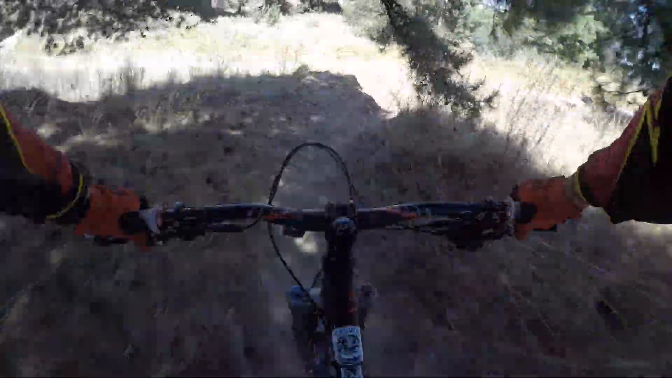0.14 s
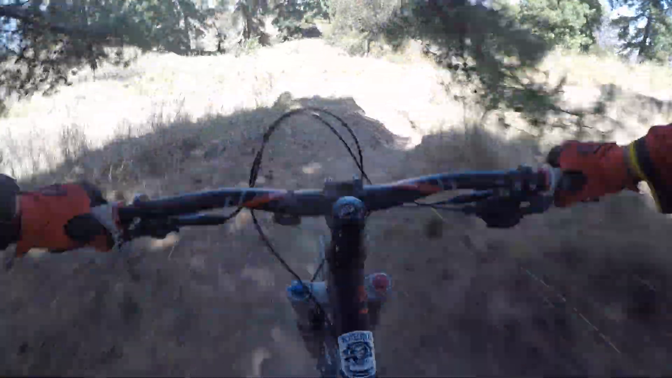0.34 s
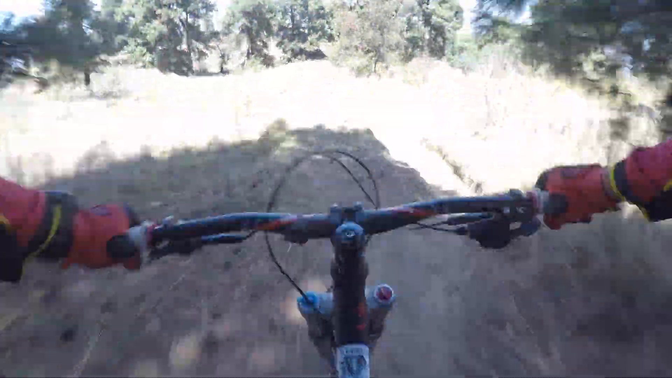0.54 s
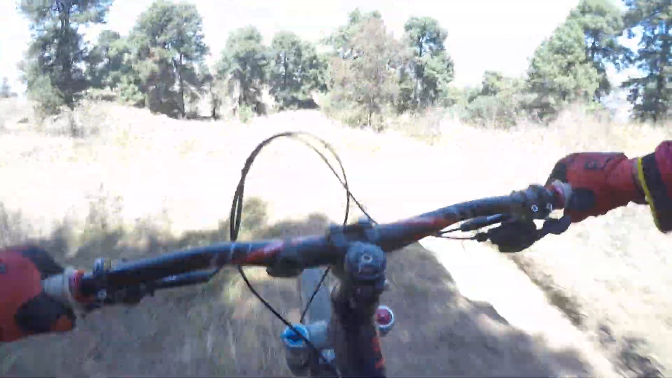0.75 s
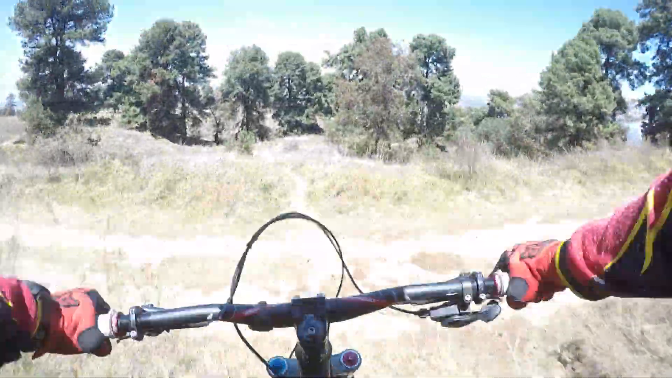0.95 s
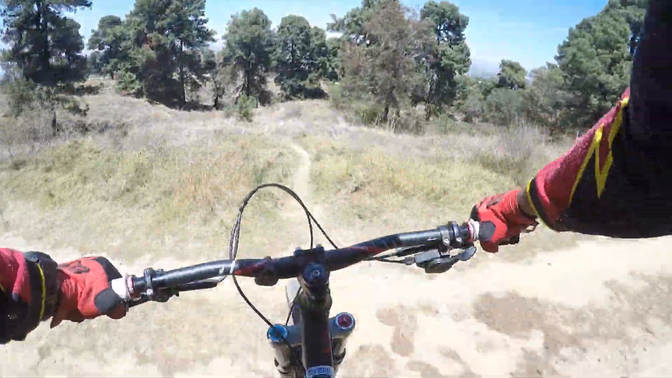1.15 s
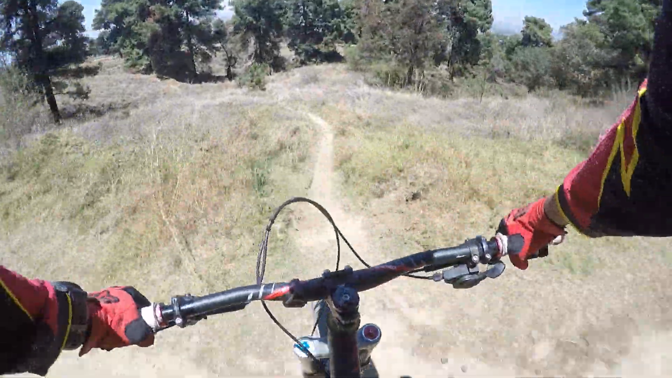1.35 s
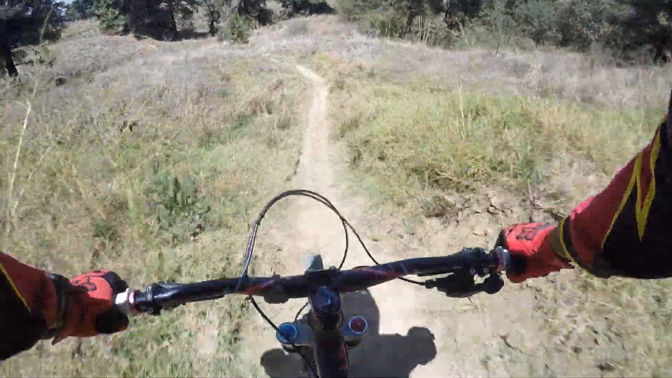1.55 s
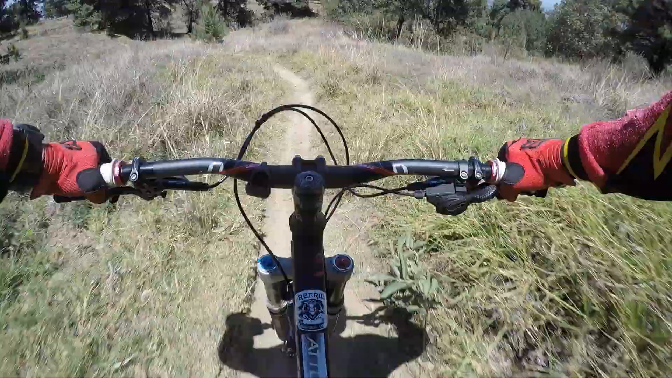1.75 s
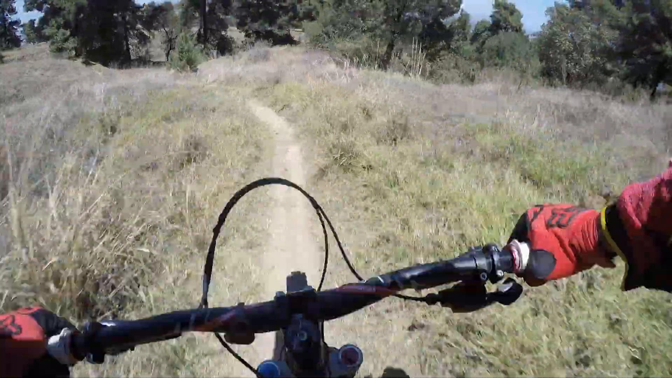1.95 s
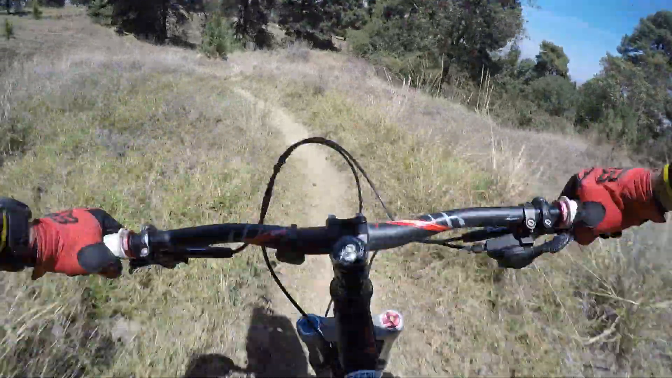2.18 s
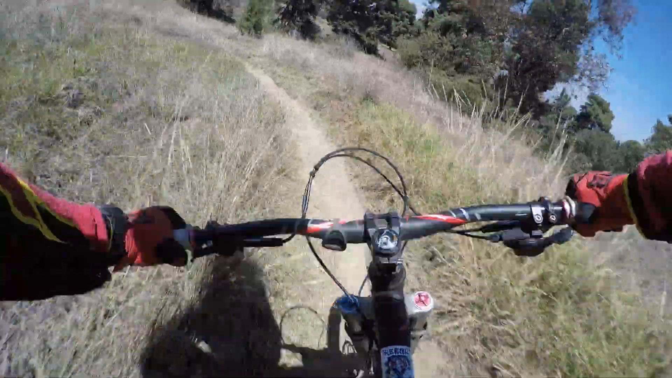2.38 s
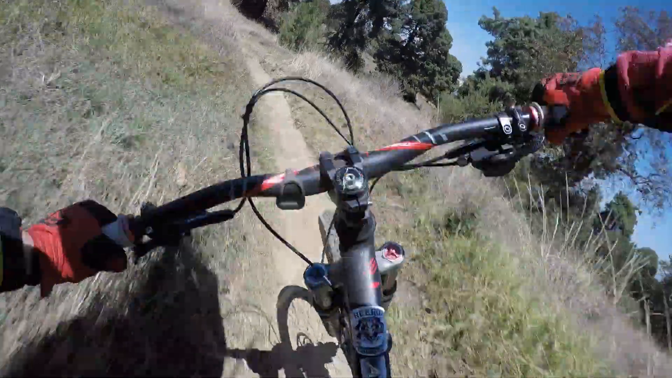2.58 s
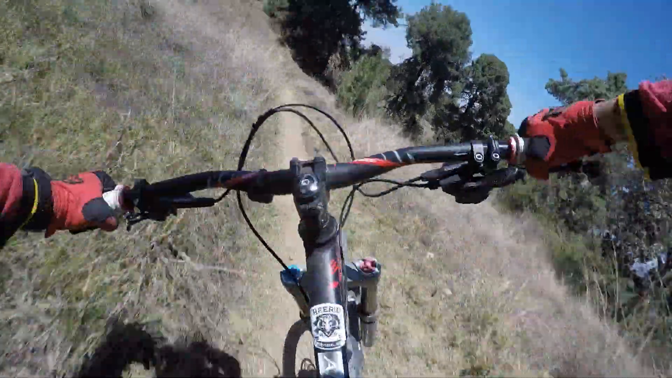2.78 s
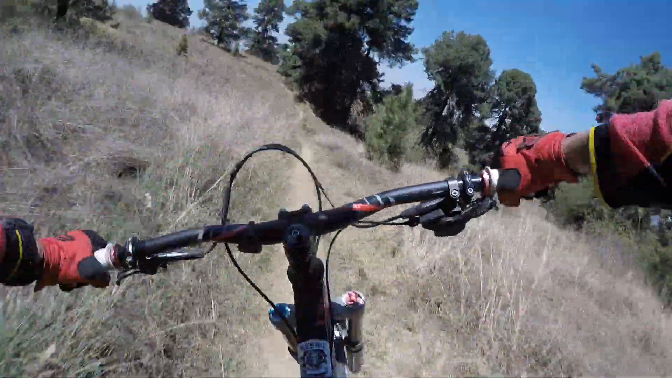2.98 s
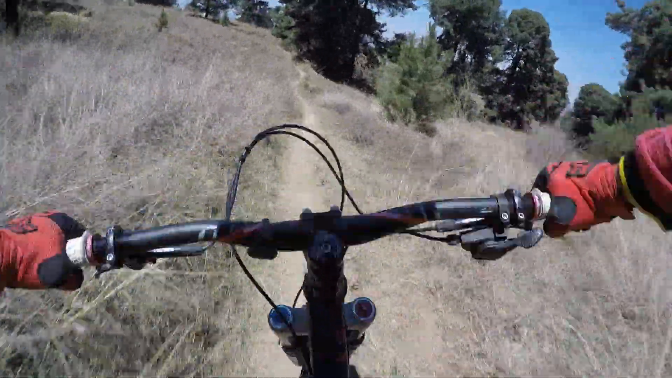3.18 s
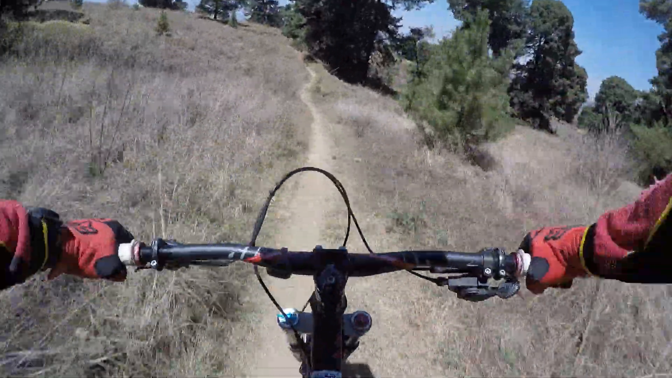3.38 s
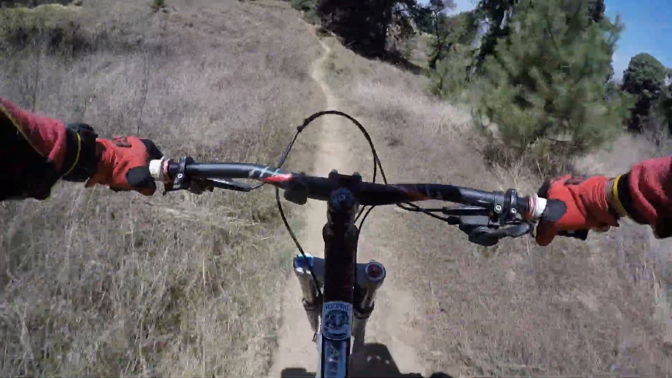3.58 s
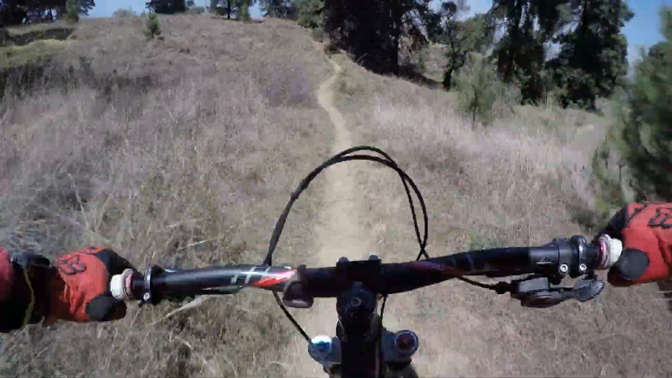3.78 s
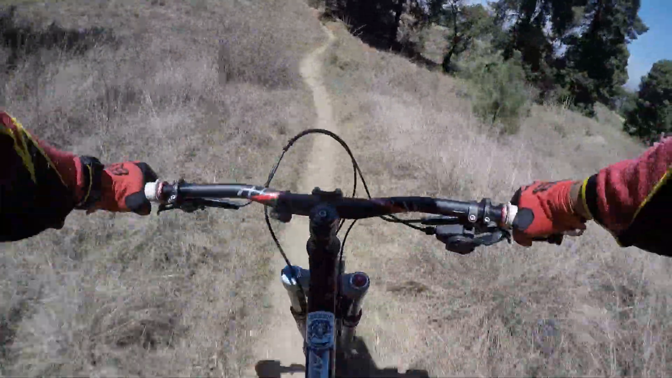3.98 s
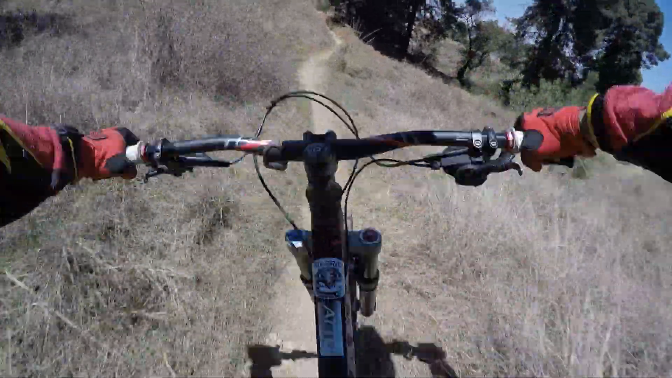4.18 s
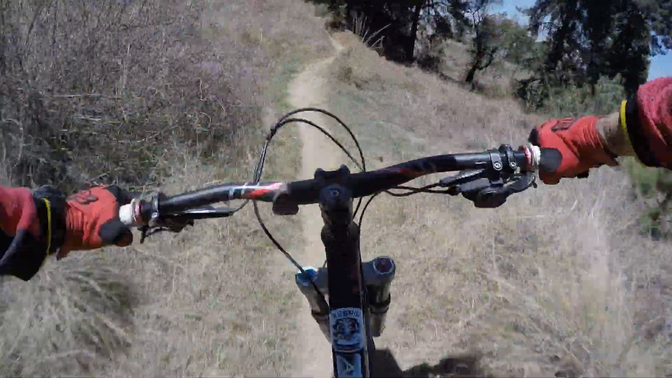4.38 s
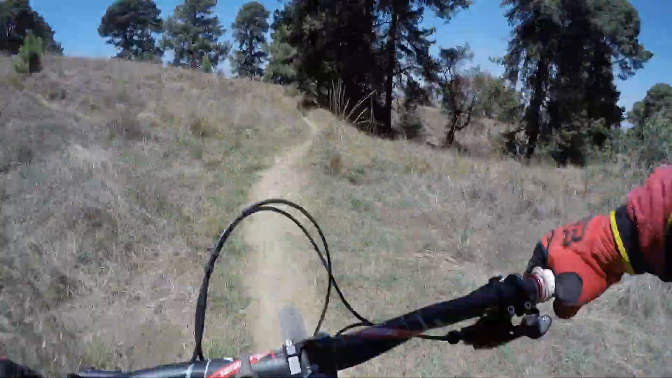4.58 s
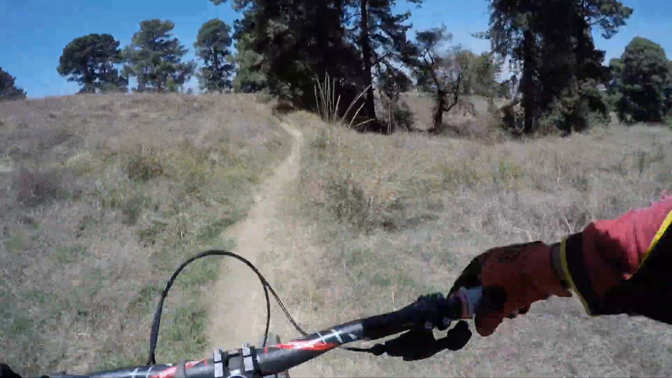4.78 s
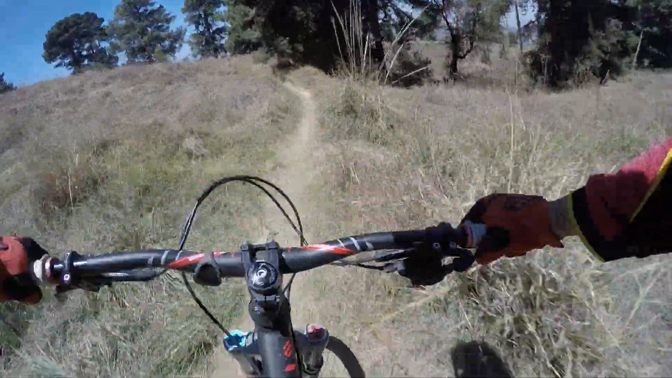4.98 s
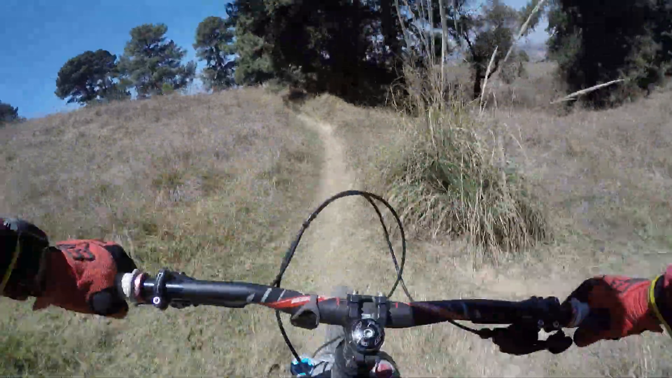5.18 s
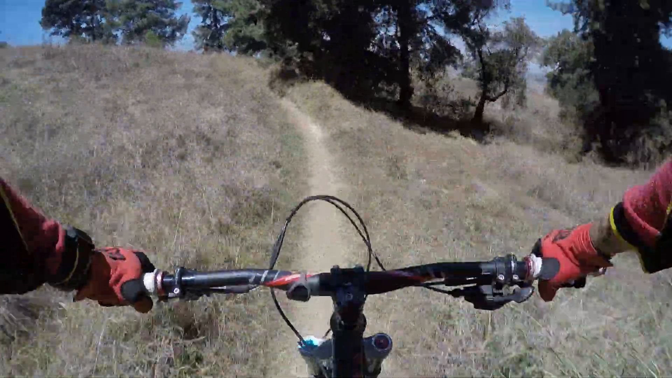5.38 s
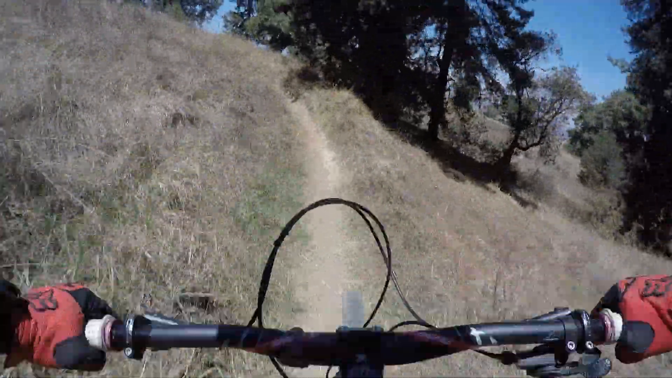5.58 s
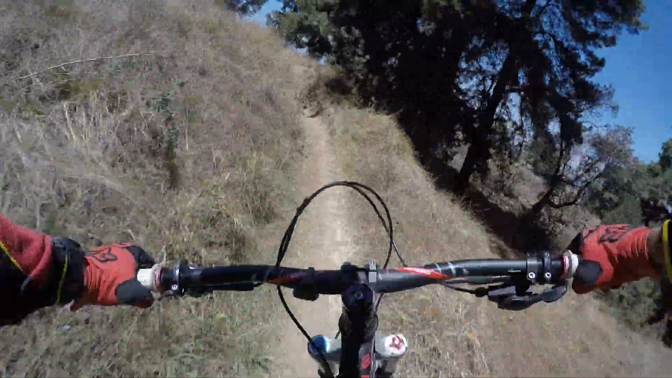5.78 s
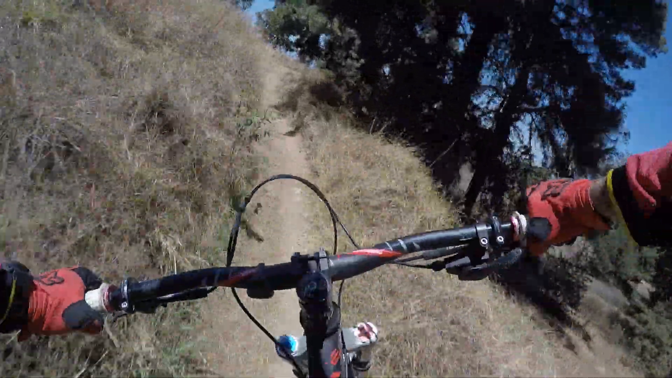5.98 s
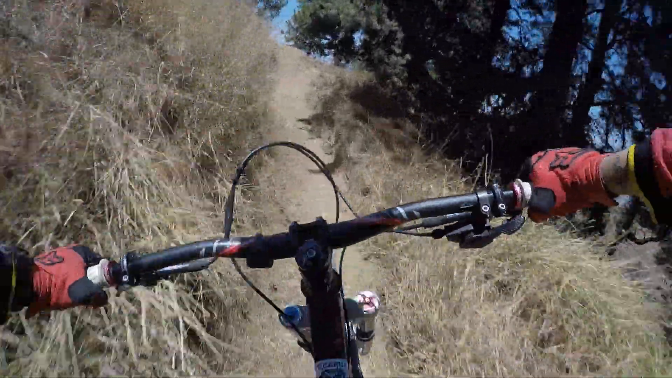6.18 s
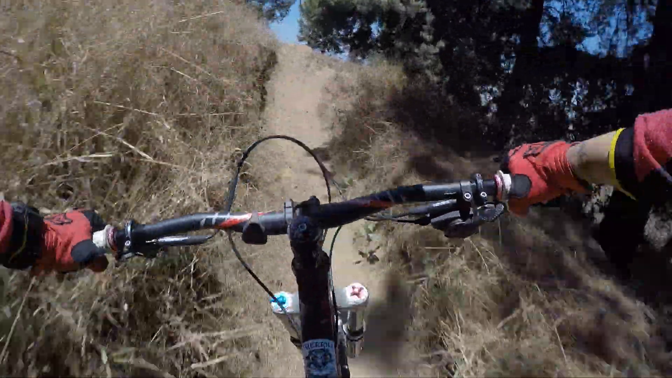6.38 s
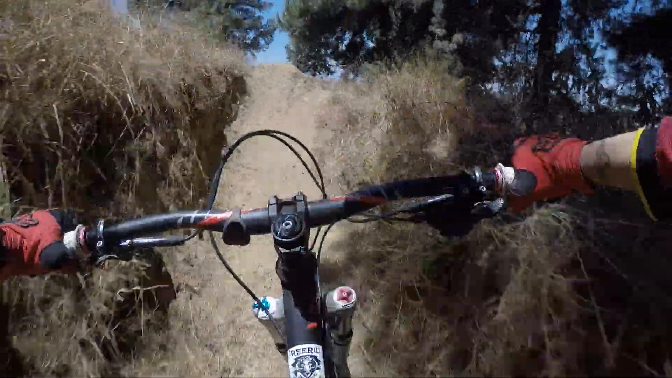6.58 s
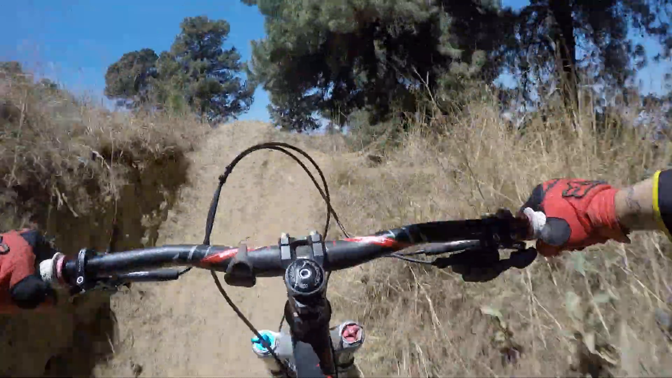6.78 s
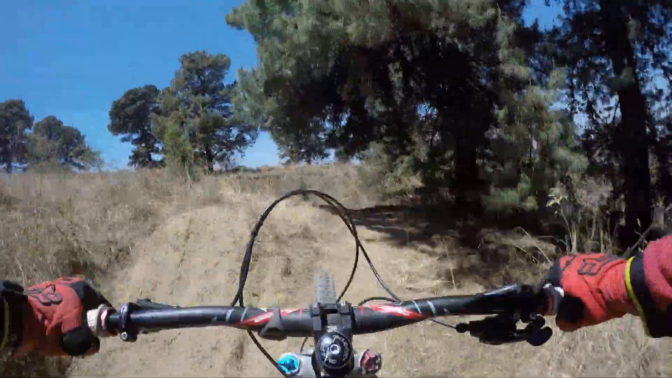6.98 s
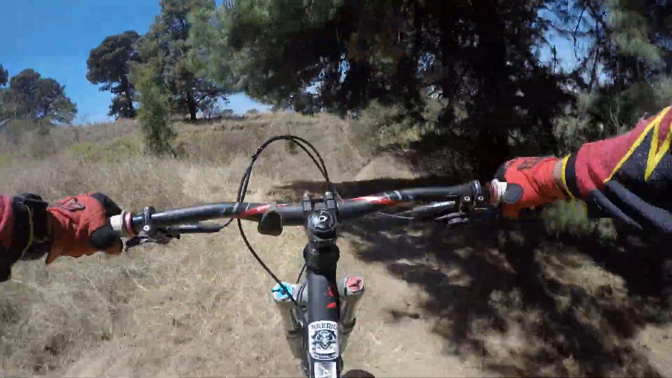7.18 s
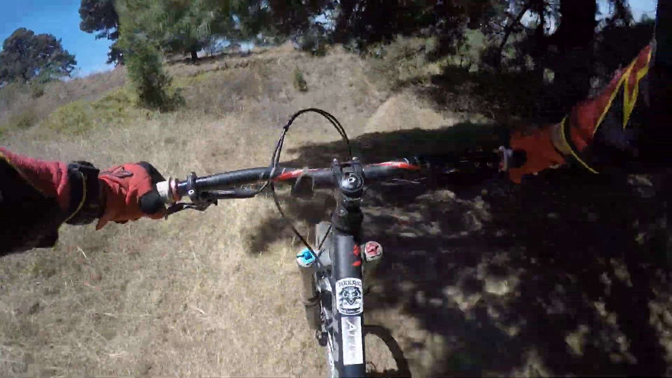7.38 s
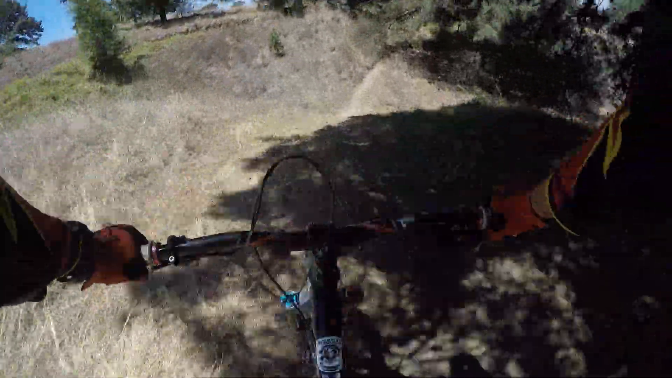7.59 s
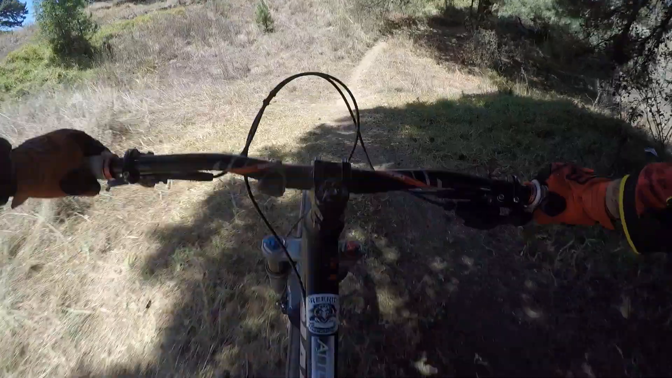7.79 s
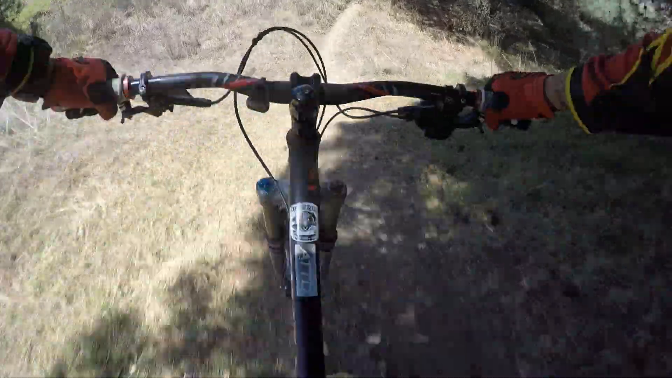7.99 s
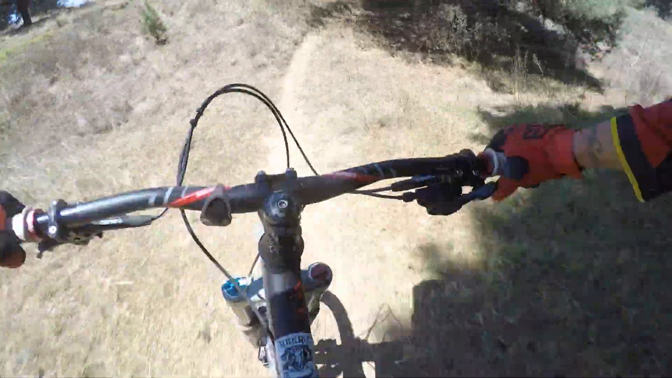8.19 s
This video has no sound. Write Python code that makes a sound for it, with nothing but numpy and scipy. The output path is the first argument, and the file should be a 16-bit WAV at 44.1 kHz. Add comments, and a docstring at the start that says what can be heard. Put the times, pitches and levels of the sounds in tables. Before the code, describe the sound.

A mountain bike clatters fast down a dirt trail, tyres crunching, dry grass rustling, with hard knocks and deep rumbling buffeting heard from inside a casing.

```python
"""Tyres crunch and rasp over dirt, dry grass rustles and buffeting rumbles as a mountain bike runs fast downhill.
Over this come whipping stalks, soft bumps, hollow landings, hard ringing knocks and muffled frame clacks.
All is heard inside a plastic housing on the rider's chest. Filtered noise makes the buffeting;
streams of tiny cracks make tyres and grass; decaying sine modes make the struck sounds."""
import sys
import numpy as np
from scipy import signal
from scipy.fft import rfft, irfft, next_fast_len
from scipy.io import wavfile

SR = 44100
rng = np.random.default_rng(int(sys.argv[2]) if len(sys.argv) > 2 else 0)


def master(y):
    """Save y as 16-bit WAV."""
    cut = np.clip(np.atleast_2d(y).T, -1, 1)
    pcm = np.round(cut * 32767)  # scale
    wavfile.write(sys.argv[1], SR, pcm.astype(np.int16))


N = 363825
TIME = np.arange(N) / SR
RING = np.arange(int(0.4 * SR)) / SR  # time within one struck sound, s

# modes of housing and mount: (nominal frequency [Hz], relative level [dB], t60 [s], polarity [+-1])
HOUSING_MODES = [(37.06, -0.5, 0.08, 1), (308, -8.5, 0.022, 1), (411, -24.5, 0.043, 1),
                 (780, -31.5, 0.047, 1), (1085, -15.5, 0.02, -1), (1221, -11.5, 0.0091, -1),
                 (1518, -6.5, 0.009, 1), (1797, -25.5, 0.042, 1), (2073, -13.5, 0.014, 1),
                 (2303, -7.5, 0.012, 1), (2520, -19, 0.027, -1), (2670, -13.5, 0.018, 1),
                 (3050, -15, 0.014, -1), (3530, -17, 0.0066, -1), (3685, -14.5, 0.013, 1),
                 (3887, -11.5, 0.0042, -1), (5900, -33, 0.018, -1)]
# spectrum of a dry stalk, also of the knock's snap: (frequency [Hz], relative level [dB])
STALK_SPECTRUM = [(700, -45), (1400, 3), (2700, 2), (3800, -3), (4450, -1.5), (4800, -1), (5400, -6),
                  (6400, -2), (8300, -7), (12200, -17), (14400, -19), (15400, -40)]
# spectrum of tyre crunch, also of the knock's buzz: (frequency [Hz], relative level [dB])
TYRE_SPECTRUM = [(150, 8.5), (300, -3), (550, -9), (850, -10), (1250, -3.5), (1700, -8), (2450, -3.5),
                 (2850, -6.5), (3250, -16), (3850, -10), (4500, -21), (7000, -28), (15000, -64)]

CRUISE_DB = -44.5  # reference tyre crunch: ordinary ground
SHAKE_DB, SHAKE_SLOPE = -22, 1  # buffeting at the reference; dB per dB of crunch
RUSTLE_DB, RUSTLE_SLOPE = -55.5, 1.04  # grass gain at the reference; dB per dB of load
VERGE_DB = -53  # load between rough patches, where grass still brushes the bike


def undb(db):
    """Decibels to gain."""
    return 10 ** (np.asarray(db) / 20)


def unit(x):
    """Scale to rms 1."""
    return x / np.sqrt(np.mean(x ** 2))


def add(out, start_s, sound):
    """Mix a sound in at start_s."""
    i = max(int(round(start_s * SR)), 0)
    out[i:i + len(sound)] += sound[:max(N - i, 0)]


def mode(hz, t60_s):
    """One struck resonance: a sine that falls 60 dB in t60_s."""
    return np.sin(2 * np.pi * hz * RING) * undb(-60 * RING / t60_s)


def swell(rise_s):
    """Envelope that rises to 1 in rise_s, then dies away."""
    age = RING / max(rise_s, 0.0005)
    return age * np.exp(1 - age)


def colour(x, spectrum):
    """Filter by a spectrum of (Hz, dB) points, interpolated over log frequency; rms 1."""
    hz, db = np.transpose(spectrum)
    size = next_fast_len(len(x) + 512)
    bin_hz = np.maximum(np.arange(size // 2 + 1) * SR / size, 1)
    gain = undb(np.interp(np.log(bin_hz), np.log(hz), db))
    return unit(irfft(rfft(x, size) * gain, size)[:len(x)])


def walk(rate_hz):
    """Smooth random drift, rms 1, through rate_hz random points a second."""
    points = rng.standard_normal(2048)
    return unit(np.interp(TIME * rate_hz, np.arange(len(points)), points))


def grains(rate_hz, spread_db, size=N):
    """Tiny cracks at random moments, a few much larger than the rest; rms 1."""
    height = undb(spread_db * np.minimum(rng.exponential(size=size), 6))
    present = rng.random(size) < rate_hz / SR
    return unit(present * height * rng.choice([-1, 1], size))


def crunch(rolling_db):
    """Tyre level in dB: power of steady rolling plus a press, hold and rebound on each rough patch."""
    # rough trail under the tyres: (start [s], length [s], crunch level [dB])
    rough_patches = [(0.166, 0.38, -43), (0.49, 0.25, -40), (0.844, 0.2, -42), (1.563, 0.2, -34),
                     (1.805, 0.25, -43), (2.365, 0.24, -39.5), (2.613, 0.37, -39.5), (2.902, 0.45, -43),
                     (3.671, 0.22, -32.5), (4.123, 0.54, -36.5), (4.985, 0.36, -40.5), (5.556, 0.13, -37.5),
                     (6.055, 0.2, -42), (6.877, 0.26, -45), (7.656, 0.25, -41.5), (8.091, 0.1, -37.5)]
    press_s, rebound_s = 0.12, 0.076  # the suspension loads the tyres, then lets go
    power = undb(rolling_db) ** 2
    for start_s, length_s, db in rough_patches:
        press = np.clip((TIME - start_s) / press_s, 0, 1)
        rebound = np.exp(-np.maximum(TIME - start_s - length_s, 0) / rebound_s)
        power = power + (undb(db) * press * rebound) ** 2
    return 10 * np.log10(power)


def tyres(crunch_db, patchy_db=2.5):
    """Knobs crush the dry dirt in a dense stream of tiny cracks."""
    cracks = colour(grains(rate_hz=2800, spread_db=1.5), TYRE_SPECTRUM)
    return cracks * undb(crunch_db + patchy_db * walk(rate_hz=50))


def rasp(load_db, level_db=-7, flicker_db=4.0):
    """Under load the sliding knobs rasp in two narrow resonances that come and go separately."""
    total = np.zeros(N)
    for hz in (1260, 2720):
        slips = grains(rate_hz=900, spread_db=3.5)
        ring = unit(signal.lfilter(*signal.iirpeak(hz, 14, fs=SR), slips))
        total += ring * undb(flicker_db * walk(rate_hz=40))
    return undb(load_db + level_db) * total / 2


def scrape(max_length_s=0.017):
    """One dry stem slides past in a short burst of tiny slips; every stem has its own colour."""
    size = int(SR * max_length_s * rng.uniform(0.5, 1))
    touch = np.sin(np.pi * np.sqrt(np.linspace(0, 1, size)))
    slips = grains(rate_hz=9000, spread_db=2, size=size)
    stem = [(hz, db + 4 * rng.standard_normal()) for hz, db in STALK_SPECTRUM]
    return colour(slips, stem) * touch


def grass(rustle_db):
    """Single blades flick the spokes in quick, uneven succession, so the rustle flutters."""
    out = np.zeros(N)
    gap_s, scatter_db = 0.018, 5.5
    for slot_s in np.arange(0, N / SR, gap_s):
        size_db = scatter_db * min(rng.standard_normal(), 2)
        add(out, slot_s + gap_s * rng.random(), undb(size_db) * scrape())
    return undb(rustle_db) * out


def buffet(shake_db, gust_db=1.0):
    """Air and trail vibration shake the housing: low-frequency noise with a drifting level."""
    # rumble spectrum: (frequency [Hz], relative level [dB])
    buffet_spectrum = [(10, 0), (20, 9), (28, 6.5), (40, -9), (60, -12.5), (85, -18), (140, -29.5),
                       (220, -34), (900, -69.5)]
    rumble = colour(rng.standard_normal(N), buffet_spectrum)
    return rumble * undb(shake_db + gust_db * walk(rate_hz=6.8))


def stalks(level_db=3):
    """Tall stalks whip along the bike, one scrape each."""
    # stalk strikes: (time [s], relative level [dB])
    stalk_hits = [(0.212, -46.5), (0.589, -48), (0.605, -39.5), (1.65, -45), (1.676, -39.5), (1.689, -39),
                  (1.759, -43), (2.719, -38.5), (2.773, -41.5), (2.788, -39), (2.834, -37), (2.857, -36),
                  (3.203, -43.5), (3.782, -30.5), (3.814, -33), (3.836, -34), (4.215, -32.5), (4.233, -38),
                  (4.279, -34.5), (4.308, -34), (4.418, -37), (4.455, -41), (4.49, -40), (4.521, -34),
                  (4.6, -43.5), (5.06, -42.5), (5.672, -41), (6.189, -42), (6.206, -39.5), (7.096, -46),
                  (7.197, -37.5), (7.382, -42), (7.764, -40.5)]
    out = np.zeros(N)
    for start_s, db in stalk_hits:
        add(out, start_s, undb(db + level_db) * scrape())
    return out


def bumps(contact_s=0.0069, level_db=0.0, scuff_db=-35.5, scuff_rise_s=0.0081):
    """A soft push up through the rider rocks the housing on its lowest mode; the harness scuffs."""
    # soft bumps: (time [s], strength [dB])
    bump_hits = [(0.261, -6), (0.365, -1.5), (0.498, 1), (0.604, 2), (0.726, 0), (1.077, -1.5), (1.626, 3),
                 (1.719, 4), (1.952, -2.5), (2.352, 0.5), (2.43, 3), (2.756, 0.5), (3.06, -2.5),
                 (3.154, -2.5), (3.269, -4), (3.72, -1.5), (4.232, 4.5), (4.381, 1), (4.48, -2), (5.057, 0),
                 (5.291, -2), (5.664, -3.5), (5.773, 0.5), (6.057, -4), (6.51, -4), (6.768, -1.5),
                 (7.057, -9), (7.731, 4), (8.143, -0.5)]
    out = np.zeros(N)
    hz, _, t60_s, _ = HOUSING_MODES[0]
    push = np.sin(np.pi * np.minimum(RING / contact_s, 1)) ** 2
    thud = signal.fftconvolve(mode(hz, t60_s), push / push.sum())[:len(RING)]
    scuff_band = signal.butter(2, [90, 220], "band", fs=SR, output="sos")
    for start_s, db in bump_hits:
        noise = rng.standard_normal(len(RING))
        scuff = unit(signal.sosfilt(scuff_band, noise)) * swell(scuff_rise_s)
        add(out, start_s, undb(db) * (undb(level_db) * thud + undb(scuff_db) * scuff))
    return out


def landings(t60_s=0.037, contact_s=0.0012):
    """A tyre lands hard and thuds through the frame: one short, hollow mode with a softened onset."""
    # landings: (time [s], relative level [dB], pitch [Hz])
    landing_hits = [(0.267, -18, 149), (3.03, -23.5, 374), (4.98, -19.5, 148), (6.454, -26, 180),
                    (7.729, -20, 184), (8.149, -18, 160)]
    out = np.zeros(N)
    onset = 1 - np.exp(-RING / contact_s)
    for start_s, db, hz in landing_hits:
        add(out, start_s, undb(db) * 2 * mode(hz, t60_s) * onset)
    return out


def knocks(hardness=0.13, buzz_db=-39, buzz_t60_s=0.19, snap_db=-35, flex_db=-24, flex_hz=485):
    """The mount hits its stop and rings the housing; hard hits snap and flex it with a woody note."""
    # mount against stop: (time [s], strength [dB])
    knock_hits = [(0.3127, -18.5), (0.455, -6), (0.5764, 1), (0.6616, 5), (0.707, -3), (0.7725, 6),
                  (0.9779, -6), (1.7826, 11), (1.9075, -5.5), (2.0167, -9), (2.0904, 6), (2.1366, -11),
                  (2.3859, -1.5), (2.6737, -11.5), (2.705, -4.5), (2.841, -10), (2.915, 2), (2.965, -1.5),
                  (3.197, -17), (3.358, -4.5), (3.9056, -10.5), (3.937, 4.5), (4.302, -6), (4.3577, 9),
                  (4.4682, -2), (4.549, 5.5), (4.677, 1), (4.743, -11), (4.976, -17.5), (5.025, -8.5),
                  (5.1329, -2.5), (5.2646, 5), (5.3313, -3.5), (5.674, -6), (5.7538, -3.5), (5.8166, -8.5),
                  (6.2527, -4.5), (6.4962, -16.5), (6.6534, -21.5), (6.734, -6), (6.995, 1.5),
                  (7.0323, -6.5), (7.728, -18.5), (7.755, -13.5), (7.8936, -5), (8.1687, -6.5)]
    out = np.zeros(N)
    scatter_db, detune = 0.8, 0.003  # small spread of each mode from hit to hit
    # the plastic stop gives a little and dulls the top
    padding = signal.butter(2, 6500, fs=SR, output="sos")
    # a small metal part of the mount rings on thinly
    screw = undb(-51) * mode(1812, 0.5)
    for start_s, db in knock_hits:
        # a harder hit has a shorter contact, which favours the high modes
        tilt_db_per_octave = hardness * db
        body = undb(flex_db + db) * mode(flex_hz, 0.021)
        for hz, mode_db, t60_s, polarity in HOUSING_MODES:
            level_chance, pitch_chance = rng.standard_normal(2)
            level_db = mode_db + scatter_db * level_chance + tilt_db_per_octave * np.log2(hz / 2000)
            body += np.sign(polarity) * undb(level_db) * mode(hz * (1 + detune * pitch_chance), t60_s)
        body = signal.sosfilt(padding, body)
        buzz = colour(rng.standard_normal(len(RING)), TYRE_SPECTRUM)
        buzz = buzz * undb(buzz_db - 60 * RING / buzz_t60_s)
        snap = colour(rng.standard_normal(len(RING)), STALK_SPECTRUM)
        snap = snap * undb(snap_db + db) * np.exp(-RING / 0.0029)
        add(out, start_s, undb(db) * (body + buzz + snap + screw))
    return out


def clack(hz, bright_db, spot_t60_s=0.012, thud_hz=400, thud_db=-13, lean_db=60):
    """One slap on the frame: a dull spot tone and the frame's modes; a lower spot favours the higher modes."""
    # upper frame modes: (nominal frequency [Hz], relative level [dB], t60 [s])
    frame_modes = [(1820, 12, 0.02), (2066, 13.5, 0.012), (2780, 13.5, 0.0081)]
    # two opposed modes either side of the spot's pitch, over a low thud
    spot = mode(hz * 0.86, spot_t60_s) - mode(hz * 1.14, spot_t60_s)
    spot = spot + undb(thud_db) * mode(thud_hz, 0.015)
    lean_db_per_octave = lean_db * np.log2(950 / hz)
    frame = np.zeros(len(RING))
    for k, (mode_hz, db, t60_s) in enumerate(frame_modes):
        level_db = db + lean_db_per_octave * np.log2(mode_hz / frame_modes[1][0])
        detuned_hz = mode_hz * (1 + 0.018 * rng.standard_normal())
        frame += (-1) ** k * undb(level_db) * mode(detuned_hz, t60_s)
    hit = spot + 0.5 * undb(bright_db) * frame
    # the contact chatters faintly for a few milliseconds
    chatter = rng.standard_normal(len(RING)) * np.exp(-RING / 0.004)
    chatter = chatter / np.linalg.norm(chatter)
    return hit + undb(-10) * signal.fftconvolve(hit, chatter)[:len(RING)]


def clacks(muffle_hz=3800):
    """Chain and cables slap the frame; the housing muffles them with a low-pass."""
    # slaps: (time [s], relative level [dB], centre pitch of struck spot [Hz], relative treble [dB])
    clack_hits = [(0.639, -17.5, 960, -28), (0.733, -11.5, 1000, -19), (0.912, -20.5, 1030, 0),
                  (1.036, -19, 780, -22.5), (1.275, -35, 980, -4), (1.632, -10.5, 1025, -18),
                  (1.725, -9.5, 940, -9.5), (1.98, -13, 830, -15.5), (2.449, -7.5, 1014, -23),
                  (2.465, -5.5, 800, -17), (2.569, -11, 794, -18), (2.869, -14, 1037, -26),
                  (2.893, -11, 810, -17), (3.261, -23.5, 1020, -26), (3.731, -8.5, 1046, -12.5),
                  (3.843, -7.5, 995, -16), (3.873, -11.5, 745, -22), (4.109, -25.5, 1010, -18),
                  (4.212, -19, 1070, -15), (4.241, -20.5, 1060, 1), (4.248, -14, 760, -30),
                  (4.314, -13, 940, -16), (4.397, -18, 775, -36), (4.573, -10, 980, -19),
                  (6.702, -27.5, 925, -30), (7.136, -27, 980, -20), (7.795, -27, 960, -22)]
    out = np.zeros(N)
    for start_s, db, hz, bright_db in clack_hits:
        add(out, start_s, undb(db) * clack(hz, bright_db))
    return signal.sosfilt(signal.butter(2, muffle_hz, fs=SR, output="sos"), out)


def scene():
    """Pace and rough patches drive crunch and buffeting, the patches alone rasp and grass; all sum to mono."""
    # pace of the ride, as tyre level on smooth dirt: (time [s], level [dB])
    pace_points = [(0, -48.5), (1.3, -54), (2.25, -48.5), (3.55, -48), (4.9, -46.5), (5.55, -43),
                   (6.7, -39.5), (7.45, -51.5), (8.25, -45.5)]
    crunch_db = crunch(np.interp(TIME, *np.transpose(pace_points)))
    load_db = crunch(VERGE_DB)
    rustle_db = RUSTLE_DB + RUSTLE_SLOPE * (load_db - CRUISE_DB)
    shake_db = SHAKE_DB + SHAKE_SLOPE * (crunch_db - CRUISE_DB)
    rolling = tyres(crunch_db) + rasp(load_db) + grass(rustle_db)
    hits = stalks() + bumps() + landings() + knocks() + clacks()
    return (rolling + buffet(shake_db) + hits)[None]


def record(dry):
    """The microphone passes no steady pressure, overloads on the hardest knocks and cuts the top."""
    overload, top_hz = 0.98, 15600
    dry = signal.sosfilt(signal.butter(1, 8, "high", fs=SR, output="sos"), dry)
    clipped = dry / (1 + np.abs(dry / overload) ** 8) ** (1 / 8)
    return signal.sosfilt(signal.ellip(8, 0.2, 90, top_hz, fs=SR, output="sos"), clipped)


dry = scene()
out = record(dry)
master(out)
```